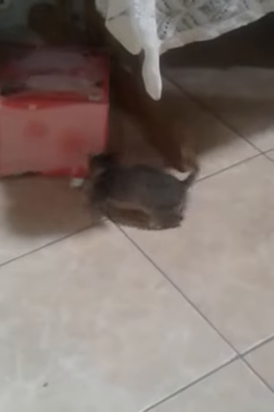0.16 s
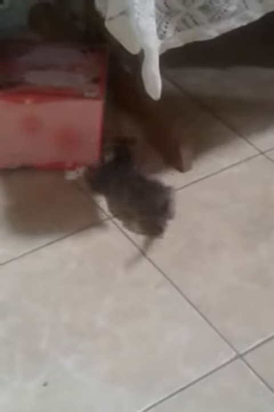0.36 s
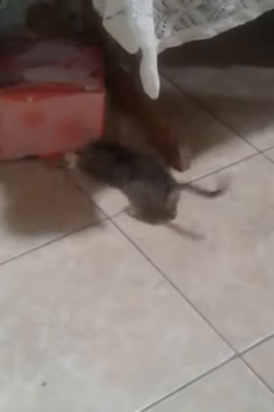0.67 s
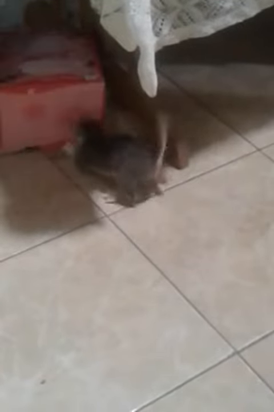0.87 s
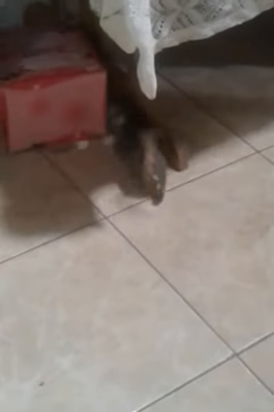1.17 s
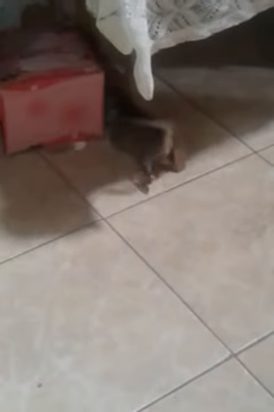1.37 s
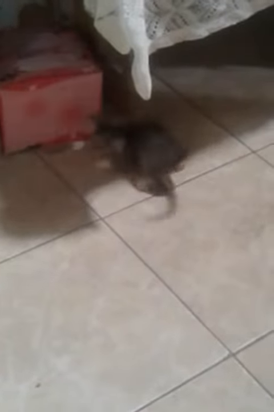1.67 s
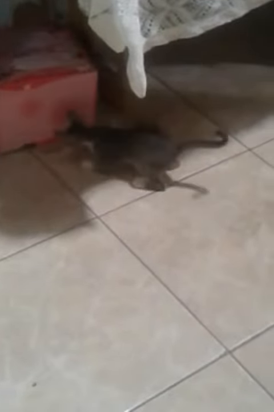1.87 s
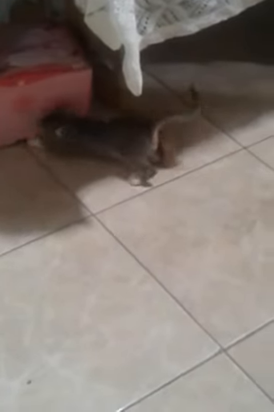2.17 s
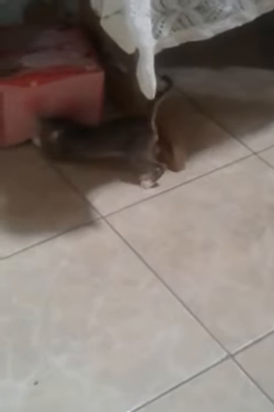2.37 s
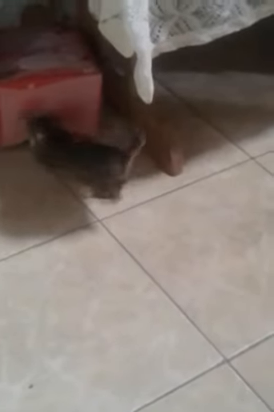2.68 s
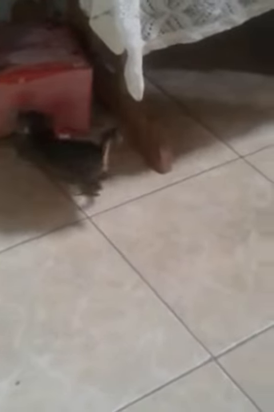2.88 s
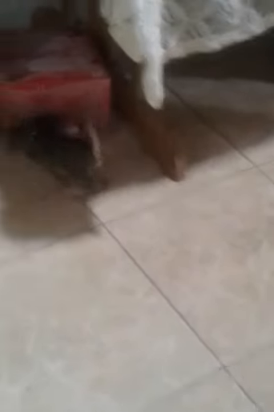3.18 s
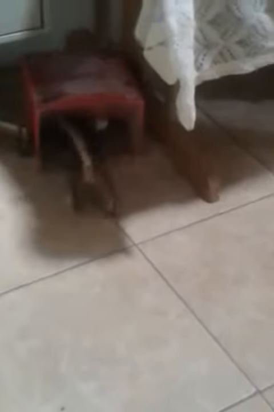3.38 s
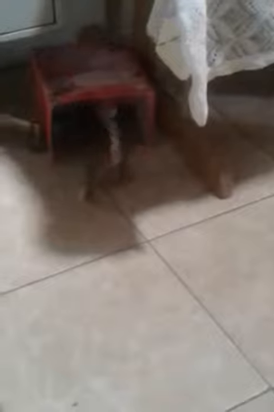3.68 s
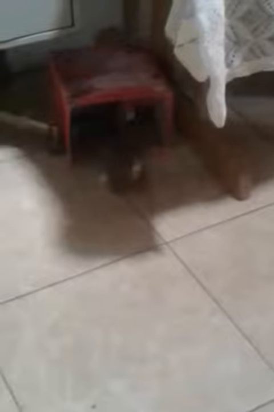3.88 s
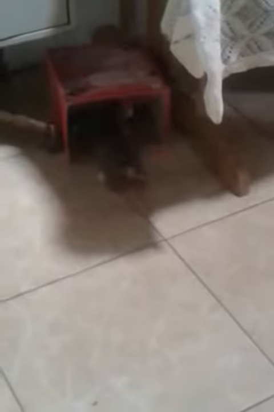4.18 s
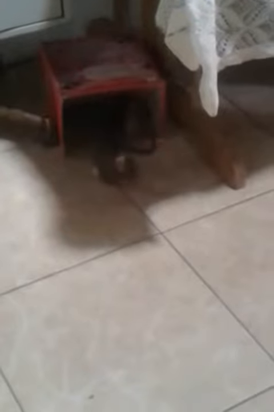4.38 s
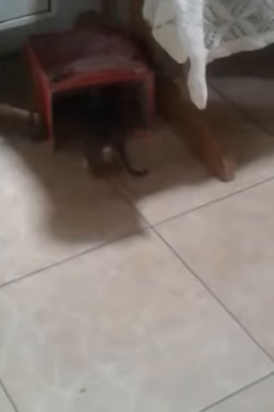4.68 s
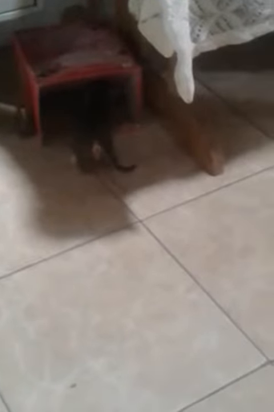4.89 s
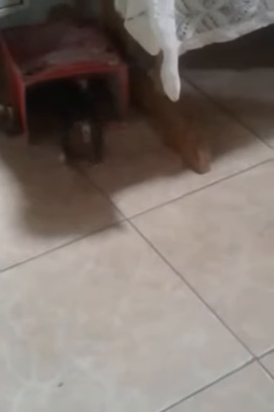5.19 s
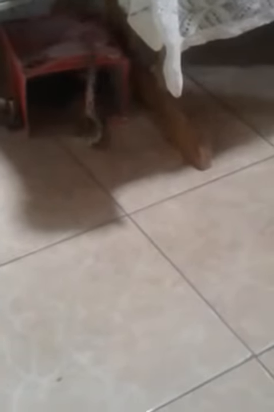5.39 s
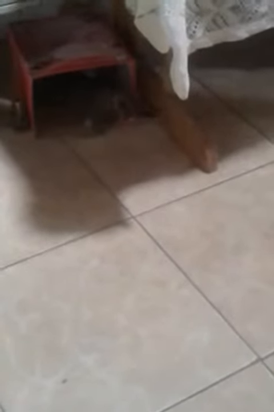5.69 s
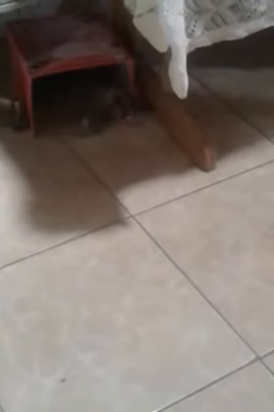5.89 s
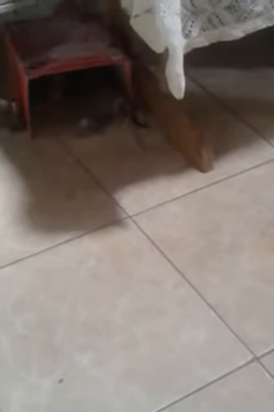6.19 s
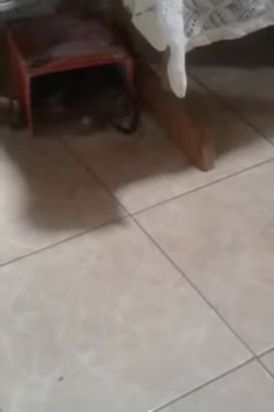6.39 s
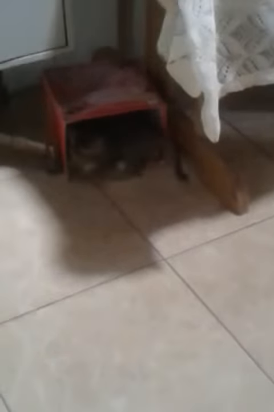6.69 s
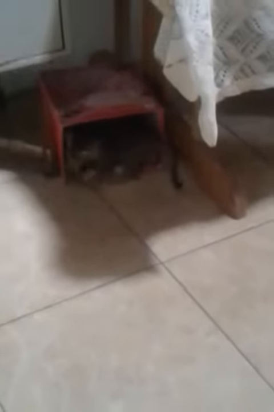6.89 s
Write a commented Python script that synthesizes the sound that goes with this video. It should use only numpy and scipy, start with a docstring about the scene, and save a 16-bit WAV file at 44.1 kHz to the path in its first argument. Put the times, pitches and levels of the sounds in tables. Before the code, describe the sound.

In a small hard-surfaced room, a steady faint bed of low rumble, hiss, mains hum and thin high whine runs throughout. From 0 to 1.3 seconds a kitten scrabbles hard at a cardboard box: quick overlapping claw scrapes, dry snaps, and a cluster of low hollow thuds with the box shuffling on tile, heaviest around 0.3 to 0.6. A soft bump near 1.4 and a tiny tick at 1.5 lead into a lull. Light scratches return around 1.8 to 2.1, strengthening with a sharp snap and short wall buzz at 2.5. From 2.9 to 3.9 scrapes and bumps come thickly as it climbs in. After a brief ease near 4.2, bursts of scratching and bumping follow at 4.5 to 4.8, with bright snaps and buzzing scuffs at 5.4 to 5.5. Then only faint rustles and small scratches, the last near 6.6, until 7 seconds.

```python
"""A kitten scrambles at a small cardboard box on a tiled floor, climbs in and scratches about inside.
Claws scrape the card in runs of tiny slips: random clicks shaped into hiss, rasp and fine grit.
Paws bump the hollow walls, which ring in a set of tones; claws snap free as short noise bursts.
The hard room adds a brief noise tail; under it lie a low rumble, hiss, hum and thin whining tones."""
import sys
import numpy as np
from scipy import signal
from scipy.fft import rfft, irfft, next_fast_len
from scipy.io import wavfile
from scipy.ndimage import uniform_filter1d, map_coordinates

SR = 44100
rng = np.random.default_rng(int(sys.argv[2]) if len(sys.argv) > 2 else 0)


def pcm_store(signal):
    """Save signal as 16-bit PCM."""
    levels = np.round(np.clip(np.atleast_2d(signal), -1, 1) * 32767)
    wavfile.write(sys.argv[1], SR, levels.astype(np.int16).T)


N = 310328  # length in samples, about 7 s

# Steady background colour: pitch_hz, relative level_db
AIR_COLOUR = [(35, -2), (58, -9), (80, -14), (150, -6), (240, 6), (370, -15), (660, -6), (1100, -25),
              (1520, -3), (1750, -6.5), (3400, -13.5), (5000, -0.5), (6700, -7), (14000, -21)]
# Thin electrical whine: pitch_hz, then one level_db for each of WHINE_TIMES, before a random drift
WHINE_TONES = [(4597, -76, -73, -67), (4845, -74, -68, -70), (5480, -71, -71, -80), (5674, -65, -66, -82),
               (6019, -77, -74, -68), (6842, -85, -84, -78), (7255, -88, -79, -70)]
# Times at which the whine levels are given: time_s
WHINE_TIMES = (0, 4.3, 7.04)
# How long the room rings: pitch_hz, time to fade by 60 dB_s
ROOM_FADE = [(100, 1), (500, 0.44), (4000, 0.73), (12000, 0.095)]
# Tones of the box's walls and cavity: pitch_hz, width_hz, relative level_db
BOX_MODES = [(93.7, 10, 1), (141.5, 8.5, -0.5), (190, 13, 2), (237.3, 7, -2.5), (282.2, 8.6, 3.5),
             (329.3, 13, -2.5), (411, 48, -7.5), (437.5, 8.8, -3), (487, 5, -2), (584, 22, -1),
             (705, 67, -6), (957, 48, -9), (1153, 65, -11.5), (1365, 44, -7)]
# The box shuffling under the kitten's weight: time_s, level_db before a fixed trim
SHUFFLE_LEVEL = [(0.0, -52.5), (0.45, -40.5), (1.19, -52), (1.57, -63), (3.41, -46), (4.29, -66),
                 (4.62, -58.5), (5.56, -48.5), (5.96, -57), (7.04, -63)]
# Paws and body bump the box, levels before fixed trims:
# start_s, thud level_db, thud centre_hz, knock above thud_db, slap above thud_db
BUMP_HITS = [(0.115, -34, 224, 4, 9.5), (0.298, -36, 230, 2.5, 12), (0.324, -32.5, 154, 2, 8.5),
             (0.351, -39.5, 191, 10.5, -8), (0.445, -31.5, 182, -47, -24), (0.469, -29, 199, -4, -1.5),
             (0.524, -30, 183, -9, -3), (0.597, -42, 112, 8, 10.5), (0.624, -38.5, 290, 7, -14),
             (0.765, -38.5, 193, -9, -1), (0.86, -32.5, 266, -28, 7.5), (0.907, -33.5, 242, -16, -25),
             (1.032, -35, 313, -0.5, 5), (1.129, -34.5, 274, -19, 2), (1.385, -47.5, 116, 3, -8),
             (1.86, -56, 340, -3, -2), (2.147, -46.5, 194, 8, 14), (2.244, -42, 293, -1, 4),
             (2.352, -42, 158, 2, -6), (2.524, -47, 297, 7, 1), (2.795, -44, 142, -2, -2),
             (2.944, -37, 165, -12, -19), (3.108, -40, 190, -2, 0), (3.164, -33, 246, 7.5, 5),
             (3.226, -40, 240, 5.5, 3), (3.378, -38, 268, 2, 4), (3.627, -38, 200, -7, -13),
             (3.86, -50.5, 228, -12, 11), (3.95, -46.5, 154, -15, -2), (4.556, -41, 170, -2.5, -10),
             (4.765, -43.5, 149, 2, 10), (4.974, -53, 145, -2, 5), (5.117, -41.5, 190, -1.5, -9),
             (5.312, -47.5, 145, 0, -11), (5.423, -35.5, 237, -5, -3)]
# Tiny dry ticks: start_s, peak level_db before a fixed trim
TICK_HITS = [(1.535, -31.5)]
# A claw catches and snaps free: start_s, skid peak level_db before the room, bright crack above it_db
CLAW_SNAPS = [(0.0343, -26, -17), (0.377, -28.5, 0), (0.5841, -28, -7), (0.7796, -22, -7),
              (1.1139, -27.5, -18), (1.1513, -30, -15), (1.2376, -24, -19), (2.1485, -29, -13),
              (2.5237, -20.5, -13), (3.1253, -23, -9), (3.1587, -21.5, -17), (3.2864, -25, -7),
              (3.4516, -20, -17), (3.5628, -21.5, -4), (3.6394, -17.5, -17), (4.022, -41, 0),
              (4.4777, -33, -17), (4.589, -32, 0), (4.6613, -19, -10), (4.7306, -20.5, -19),
              (4.778, -28, -3), (5.1781, -41, 2), (5.3996, -19.5, -19), (5.4066, -18, -21),
              (6.6413, -37.5, -17)]
# Colour of the skid after a claw snaps free: pitch_hz, relative level_db
SNAP_COLOUR = [(80, -52), (600, -13), (1500, -16), (3000, -0.5), (4900, 5.5), (6000, 3.5), (7500, -17),
               (14000, -31)]
# A claw drags across the hollow wall and makes it buzz:
# start_s, peak level_db, pitch_hz, time to fade by 60 dB_s
WALL_SCUFFS = [(2.543, -30.5, 1330, 0.18), (3.456, -28.5, 1900, 0.24), (5.425, -30, 2910, 0.35),
               (5.509, -32, 3030, 0.36)]
# A paw drags its claws over card or tile, levels before fixed trims:
# start_s, length_s, hiss level_db, rasp of the card above hiss_db, fine grit above hiss_db
PAW_STROKES = [(0.0, 0.011, -38.5, -4, -26), (0.039, 0.06, -35, 0, -23), (0.102, 0.13, -33.5, -4.5, -14),
               (0.245, 0.089, -38, -0.5, -21), (0.438, 0.11, -42, -3, -13), (0.59, 0.081, -40.5, 2, -17),
               (0.72, 0.13, -37, -5.5, -9), (0.857, 0.053, -33, -4.5, -14.5),
               (0.979, 0.065, -40.5, -3, -30), (1.111, 0.03, -39, 5.5, -13), (1.152, 0.043, -31, -1.5, -16),
               (1.229, 0.049, -30, 0.5, -27), (1.296, .015, -43.5, 5, -33), (1.829, 0.08, -53, -2, -14),
               (2.071, 0.068, -49, -2.5, -23), (2.132, 0.15, -44, -1.5, -19), (2.285, 0.11, -42.5, -4, -21),
               (2.516, 0.066, -36, -5.5, -23), (2.634, 0.077, -44.5, 0.5, -30),
               (2.774, 0.05, -40.5, -1.5, -36), (2.949, 0.037, -39, -8, -32),
               (3.085, 0.074, -44, -5.5, -10), (3.154, 0.087, -35.5, -2.5, -21),
               (3.212, 0.091, -35, -10.5, -13.5), (3.372, 0.061, -41.5, 0, -7.5),
               (3.446, 0.023, -32.5, -2, -19), (3.556, 0.057, -35.5, -6.5, -8),
               (3.619, 0.093, -32, -5.5, -8), (3.699, 0.038, -30.5, -8, -24),
               (3.915, 0.057, -43.5, -3, -18), (4.008, .025, -49, -3.5, -9), (4.47, 0.035, -43.5, -6, -17),
               (4.582, .06, -44, -8, -10), (4.657, .012, -34.5, -12, -18), (4.713, 0.094, -39.5, -8, -12),
               (4.963, 0.027, -63, -6, -20), (5.162, 0.091, -48.5, -1, -12), (5.396, 0.011, -32, -17, -24),
               (5.416, 0.047, -32.5, -9, -11), (5.485, 0.075, -33, -12, -15.5), (5.81, 0.068, -56.5, 1, -7),
               (6.022, .06, -56, -2, -15), (6.32, .12, -55, -8, -6.5), (6.499, 0.044, -47.5, -6.5, -8.5),
               (6.635, 0.02, -53, 2, -16)]
# Soft rustle between strokes: time_s, level_db before its colour offsets and fixed trims
RUSTLE_LEVEL = [(0, -44), (1.3, -46.5), (1.55, -54.5), (1.8, -64), (2.05, -59), (2.65, -48), (3.8, -48),
                (4.25, -61), (4.9, -55), (5.72, -50), (6.0, -58), (6.7, -57.5), (7.04, -64)]
# Offsets that colour the rustle: hiss_db, rasp_db, grit_db
RUSTLE_OFFSETS = (0.5, -6, -12.5)
# Fading after the paw lifts: hiss_db_per_s, rasp_db_per_s, grit_db_per_s
RELEASE_RATES = (145, 142, 156)
# Colour of the hiss at the claw tips: pitch_hz, relative level_db
HISS_COLOUR = [(100, -60), (400, -41), (2200, -34.5), (3300, -21.5), (4200, -5.5), (4700, -1), (5250, -1.5),
               (5800, -6.5), (6700, -15), (8000, -23.5), (10000, -47.5)]
# Colour of the rasp in the card: pitch_hz, relative level_db
RASP_COLOUR = [(100, -56), (700, -13), (1100, -9.5), (1380, -1.5), (1700, -0.3), (2300, 4.5), (3000, -0.2),
               (3250, -2), (3700, -5), (5000, -29.5)]
# Colour of the fine, bright grit: pitch_hz, relative level_db
GRIT_COLOUR = [(5500, -13), (7800, 1.5), (10000, 1.5), (12000, -2.5), (14000, -10.5)]
# Colour of the wall flexing under the rasp: pitch_hz, relative level_db
FLEX_COLOUR = [(60, -21), (250, 1), (450, 2), (700, -3.5), (1000, -3.5), (1500, -22), (2500, -46)]

TOP_HZ = 14100  # nothing is kept above this
HUM_HZ = 59.2
BITE_SHARE = 0.35  # part of a stroke's length in which the claws dig in
PRESS_DB = -0.5  # level change from start to end of a stroke
FLEX_DB = -11  # the wall's low voice, relative to a soft rasp
FLEX_LIMIT_DB = -39  # around this rasp level the wall starts to give no further


def amp(db):
    """Turn decibels into a gain."""
    return 10 ** (np.asarray(db) / 20)


def unit(x):
    """Scale x to an average strength (rms) of 1."""
    return x / np.sqrt(np.mean(x ** 2) + 1e-20)


def along(points, hz):
    """Read a value at any pitch from (pitch, value) points, on a log pitch axis."""
    point_hz, values = np.transpose(points)
    return np.interp(np.log(hz + 1), np.log(point_hz + 1), values)


def curves(rows):
    """Join timed rows with straight lines: one curve for each column after the time."""
    times, *columns = np.transpose(rows)
    return [np.interp(np.arange(N) / SR, times, column) for column in columns]


def wobble(rate):
    """Make a smooth random curve with this many random points a second."""
    knots = rng.standard_normal(int(N * rate / SR) + 4)
    return map_coordinates(knots, [np.arange(N) * rate / SR])


def filtered(x, response):
    """Multiply each pitch in x by the response at that pitch."""
    size = next_fast_len(len(x) + SR // 4)  # spare room so the end does not wrap onto the start
    spectrum = rfft(x, size) * response(np.fft.rfftfreq(size, 1 / SR))
    return irfft(spectrum, size)[:len(x)]


def coloured(x, colour):
    """Shape x with a colour table, then scale it to rms 1."""
    return unit(filtered(x, lambda hz: amp(along(colour, hz))))


def add(track, start_s, sound, peak_db):
    """Mix a sound into the track at its start time, with the given peak level."""
    part = track[round(start_s * SR):][:len(sound)]
    scaled = amp(peak_db) * sound / np.abs(sound).max()
    part += scaled[:len(part)]


def slips(rate, spread_db):
    """Stick-slip: tiny clicks at random moments (rate a second), a few much larger than the rest."""
    size = amp(spread_db * np.minimum(rng.exponential(size=N), 4))
    happens = rng.random(N) < rate / SR
    return happens * size * rng.choice([-1, 1], N)


def background():
    """Steady rumble, hiss and mains hum, with thin whining tones that drift in strength."""
    t = np.arange(N) / SR
    air = amp(-60 + 0.45 * wobble(3.26)) * coloured(rng.standard_normal(N), AIR_COLOUR)
    air += amp(-79.0) * np.sqrt(2) * np.sin(2 * np.pi * HUM_HZ * t)
    for pitch_hz, *levels_db in WHINE_TONES:
        level = amp(np.interp(t, WHINE_TIMES, levels_db) + 1.5 * wobble(4))
        phase = 2 * np.pi * pitch_hz * t + 0.25 * wobble(8)
        air += np.sqrt(2) * level * np.sin(phase)
    return air


def in_room(x, wet_db):
    """Direct sound plus the tail of tiles and walls; the paths change as the kitten moves."""
    # four noise tails, each pitch fading at its own speed
    hz, t, spectrum = signal.stft(rng.standard_normal((4, SR // 2)), SR, nperseg=256)
    fade = amp(-60 * t / along(ROOM_FADE, hz)[:, None])
    tails = signal.istft(spectrum * fade, SR, nperseg=256)[1]
    # the tail starts 1/300 s after the direct sound
    tails = np.pad(tails, ((0, 0), (SR // 300, 0))) / np.linalg.norm(tails[0])
    # a slowly turning mix of the four tails, constant in total power
    place = 2 * np.pi * np.arange(N) / SR + wobble(1.96)
    paths = np.array([np.cos(place), np.sin(place), np.cos(place / 2), np.sin(place / 2)]) / np.sqrt(2)
    echo = signal.fftconvolve(paths * x, tails, axes=1).sum(0)[:N]
    return (x + amp(wet_db) * echo) / np.hypot(1, amp(wet_db))


def box(hz):
    """Response of the box: a sum of resonances, every second one with its sign flipped."""
    total = 0
    for k, (centre, width, db) in enumerate(BOX_MODES):
        peak = 1j * hz * width / (centre * centre - hz * hz + 1j * hz * width)
        total = total + (-1) ** k * amp(db) * peak
    return total


def shuffling():
    """The box drags on the tiles: slips drive its resonances into a drone."""
    level_db, = curves(SHUFFLE_LEVEL)
    drone = unit(filtered(slips(rate=1400, spread_db=1.5), box))
    return amp(level_db - 6.5) * drone


def bumps():
    """A push wakes the box's modes: a thud, plus a knock and a slap if the contact is hard."""
    rings, puffs, t = np.zeros(N), np.zeros(N), np.arange(SR // 2) / SR
    hz, width, mode_db = np.transpose(BOX_MODES)[:, :, None]
    # part of each mode leaves at once through the paw, the rest rings on
    onset = 1 - np.exp(-t / 0.0053)
    decay = (amp(-60 * t / 0.039) + 0.45 * np.exp(-np.pi * width * t)) * onset
    for start_s, thud_db, centre_hz, knock_db, slap_db in BUMP_HITS:
        phase = 2 * np.pi * (hz * t + rng.random(hz.shape))
        modes = amp(mode_db + rng.normal(0, 2.0, hz.shape)) * decay * np.sin(phase)
        # the card flexes and rattles while the paw presses on it
        puff = rng.standard_normal(len(t)) * amp(-60 * t / 0.1)
        # thud, knock, slap: middle_hz, width_octaves, ring level_db, puff above ring_db
        parts = ((centre_hz, 0.5, thud_db - 1.0, -9),
                 (520, 0.4, thud_db + knock_db - 3.5, -6),
                 (1250, 0.4, thud_db + slap_db - 8.0, 2))
        for middle_hz, octaves, ring_db, puff_db in parts:
            weight = lambda f: np.exp(-0.5 * (np.log2((f + 1) / middle_hz) / octaves) ** 2)
            add(rings, start_s, (weight(hz) * modes).sum(0), ring_db)
            add(puffs, start_s, filtered(puff, weight), ring_db + puff_db)
    return rings + in_room(puffs, wet_db=2.0)


def ticks():
    """A tiny, bright, dry tick: a very short noise burst."""
    out, t = np.zeros(N), np.arange(SR // 50) / SR
    colour = [(3300, -37), (5200, 20), (9000, -15), (12000, 1)]  # pitch_hz, relative level_db
    for start_s, peak_db in TICK_HITS:
        crack = rng.standard_normal(len(t)) * amp(-60 * t / 0.0055)
        add(out, start_s, coloured(crack, colour), peak_db + 3.0)
    return out


def claws():
    """Each claw snaps free with a dry crack and skids on for a moment, both made of fading noise."""
    skids, cracks, t = np.zeros(N), np.zeros(N), np.arange(SR // 5) / SR
    crack_colour = [(100, -50), (2500, -11), (6000, 0), (14000, -14)]  # pitch_hz, relative level_db
    for start_s, skid_db, crack_db in CLAW_SNAPS:
        skid_fade = amp(-60 * t / 0.011) + 0.16 * amp(-60 * t / 0.044)
        skid = rng.standard_normal(len(t)) * skid_fade
        crack = rng.standard_normal(len(t)) * amp(-60 * t / 0.0041)
        add(skids, start_s, coloured(skid, SNAP_COLOUR), skid_db)
        add(cracks, start_s, coloured(crack, crack_colour), skid_db + crack_db)
    return cracks + in_room(skids, wet_db=-3)


def scuffs():
    """A short drag rings in one narrow band of the wall: noise through a single peak."""
    out, t = np.zeros(N), np.arange(SR // 3) / SR
    for start_s, peak_db, pitch_hz, fade_s in WALL_SCUFFS:
        band = lambda hz: 1 / (1 + ((hz - pitch_hz) / (0.12 * pitch_hz)) ** 2)
        buzz = filtered(rng.standard_normal(len(t)), band)
        envelope = (1 - np.exp(-t / 0.0038)) * amp(-60 * t / fade_s)
        add(out, start_s, buzz * envelope, peak_db)
    return out


def card(x, patchy_db):
    """Each spot of the card rings differently: short-lived peaks come and go in the spectrum."""
    spectrum = signal.stft(x, nperseg=512)[2]
    field = rng.standard_normal(spectrum.shape)
    field = uniform_filter1d(field, size=3, axis=0)  # smooth over pitch
    field = uniform_filter1d(field, size=10, axis=1)  # smooth over time
    return signal.istft(spectrum * amp(patchy_db * unit(field)), nperseg=512)[1][:N]


def pressure():
    """Levels of hiss, rasp and grit: each stroke bites, presses and dies away over the soft rustle."""
    t = np.arange(SR) / SR
    rustle_db, = curves(RUSTLE_LEVEL)
    # powers, not levels, are summed where strokes overlap
    power = amp(np.array(RUSTLE_OFFSETS)[:, None] + rustle_db) ** 2
    for start_s, length, hiss_db, rasp_db, grit_db in PAW_STROKES:
        bite = np.minimum(t / (BITE_SHARE * length), 1)
        press_db = PRESS_DB * (np.minimum(t / length, 1) - 0.5)
        release_db = np.outer(RELEASE_RATES, np.maximum(t - length, 0))
        layer_db = hiss_db + np.array([[0], [rasp_db], [grit_db]])
        stroke = bite * amp(layer_db + press_db - release_db) ** 2
        part = power[:, round(start_s * SR):][:, :len(t)]
        part += stroke[:, :part.shape[1]]
    return np.sqrt(power)


def scraping():
    """Runs of slips hiss at the claw tips, rasp in the card and flex the wall; the grip comes and goes."""
    hiss_level, rasp_level, grit_level = pressure()
    grip = amp(0.17 * wobble(70))
    slide = slips(rate=2000, spread_db=2.0) * amp(0.4 * wobble(220))
    run = card(in_room(slide, wet_db=-3.5), patchy_db=2.5)
    hiss = amp(-0.5) * hiss_level * coloured(run, HISS_COLOUR)
    rasp = amp(-3.0) * rasp_level * coloured(run, RASP_COLOUR)
    grit = amp(-3.0) * grit_level * coloured(run, GRIT_COLOUR)
    # the wall follows a soft rasp but gives no further under a strong one
    flex_level = rasp_level / np.hypot(1, rasp_level / amp(FLEX_LIMIT_DB))
    flex = amp(FLEX_DB) * flex_level * coloured(run, FLEX_COLOUR)
    return grip * (hiss + rasp + grit + flex)


def scene():
    """Kitten, box and room at one microphone."""
    box_sounds = shuffling() + bumps()
    claw_sounds = ticks() + claws() + scuffs() + scraping()
    return (background() + box_sounds + claw_sounds)[None]


def record(dry):
    """The small microphone loses the deepest bass, and nothing is kept above the band limit."""
    low_cut = signal.butter(4, 48, 'high', fs=SR, output='sos')
    without_bass = signal.sosfilt(low_cut, dry)
    return np.array([filtered(x, lambda hz: hz < TOP_HZ) for x in without_bass])


dry = scene()
out = record(dry)
pcm_store(out)
```